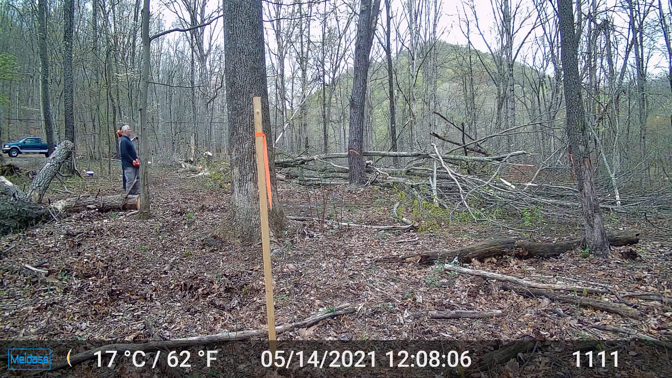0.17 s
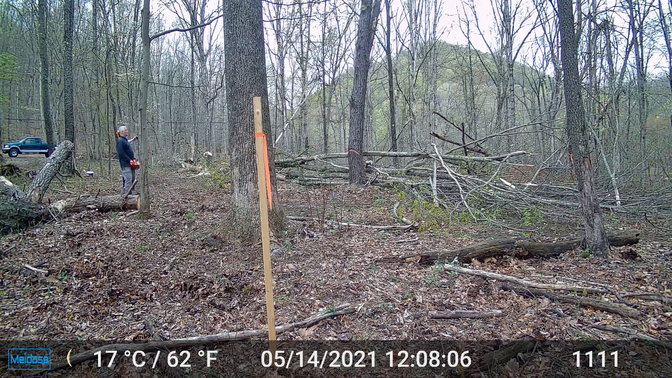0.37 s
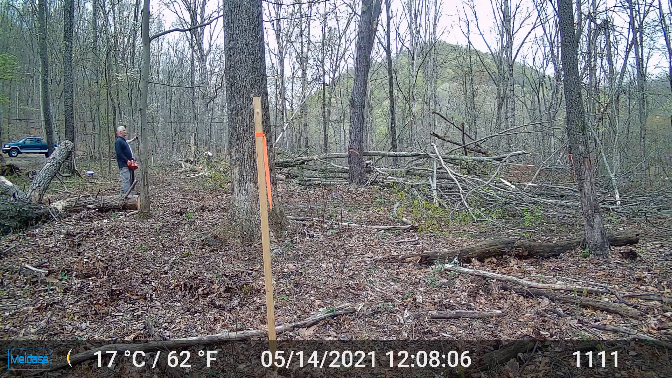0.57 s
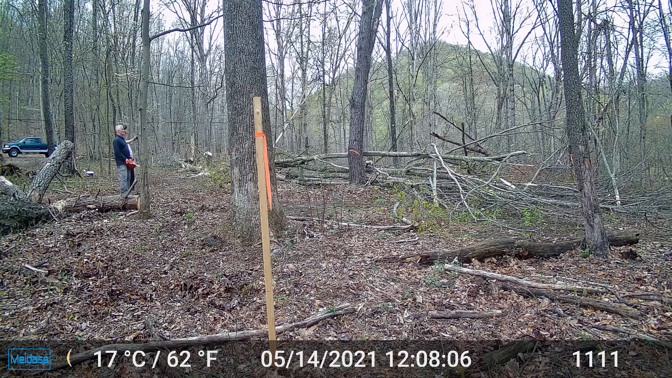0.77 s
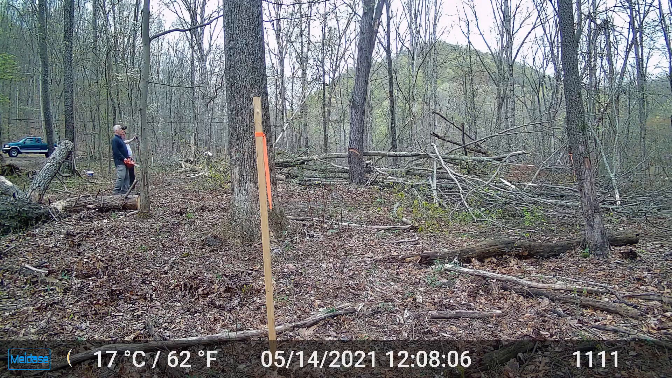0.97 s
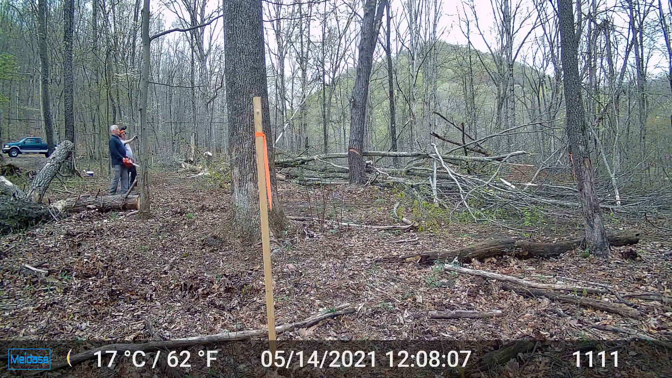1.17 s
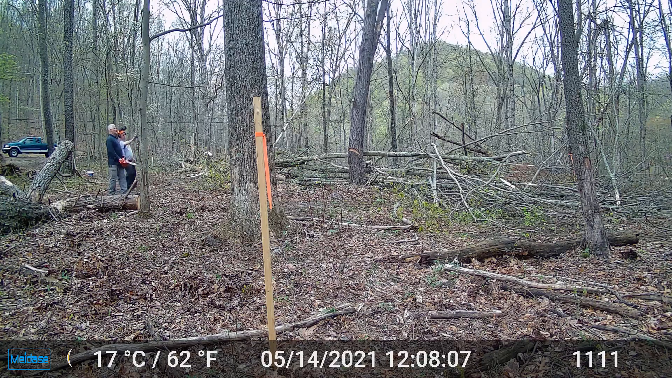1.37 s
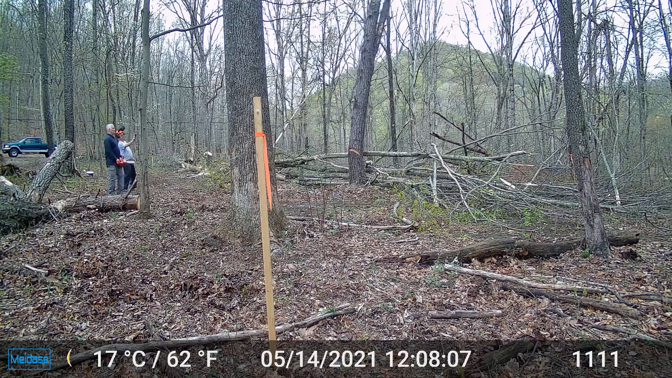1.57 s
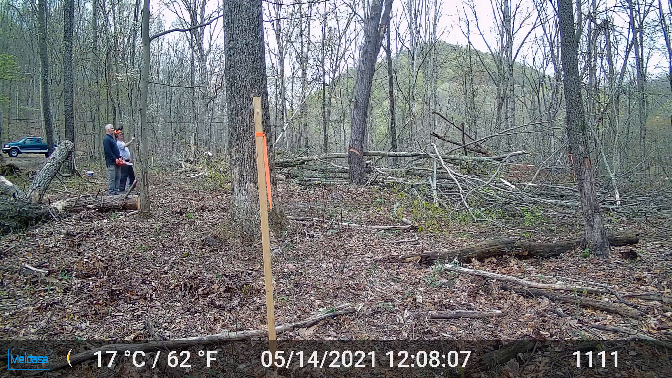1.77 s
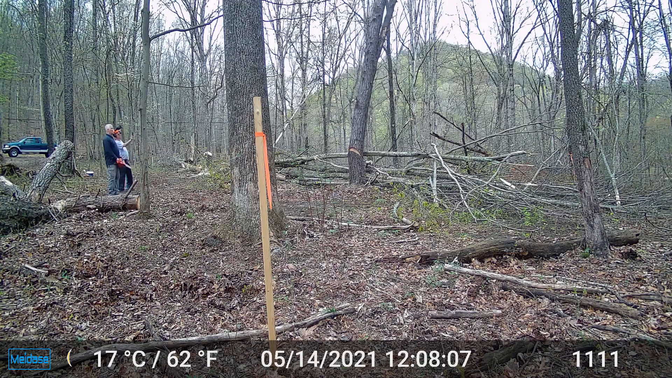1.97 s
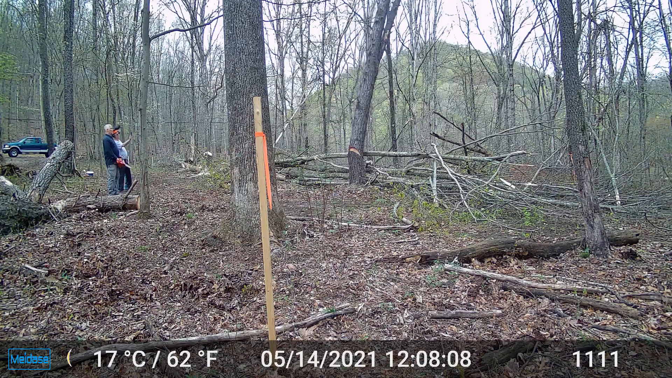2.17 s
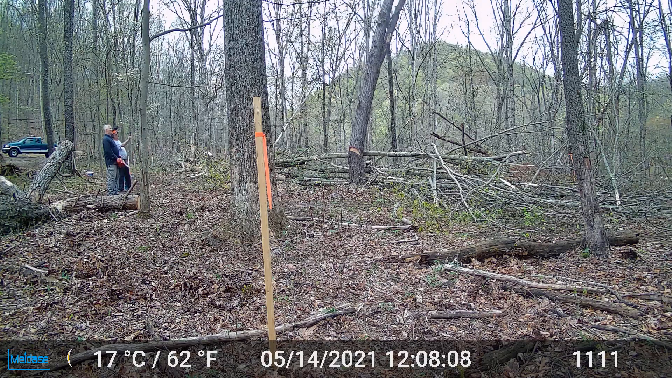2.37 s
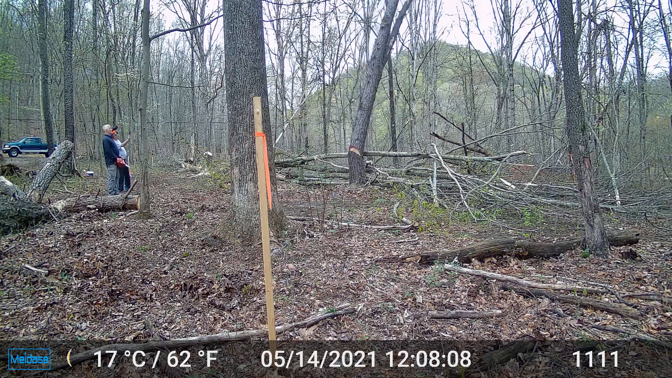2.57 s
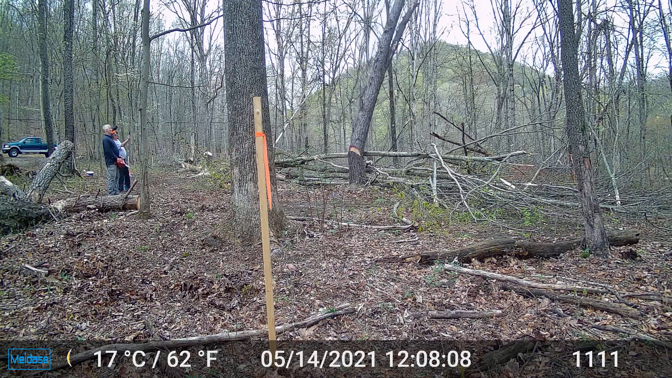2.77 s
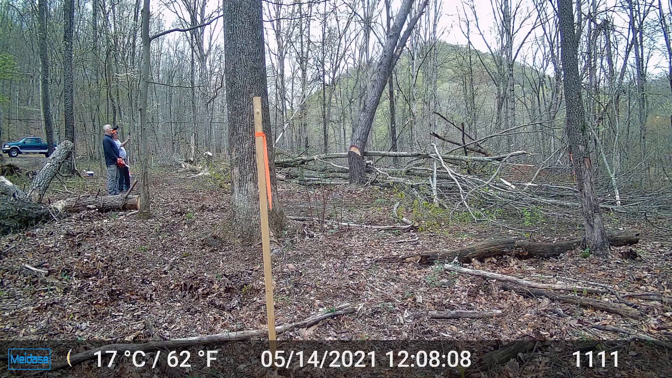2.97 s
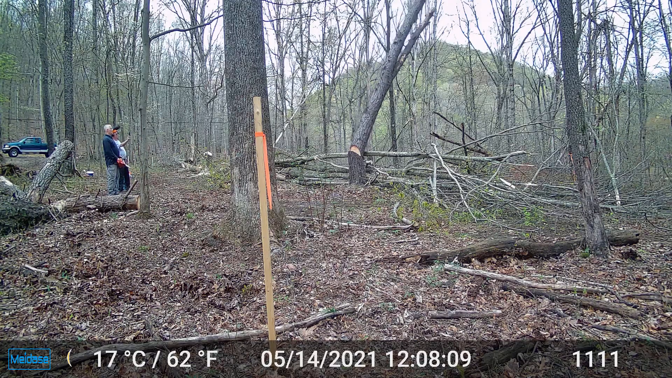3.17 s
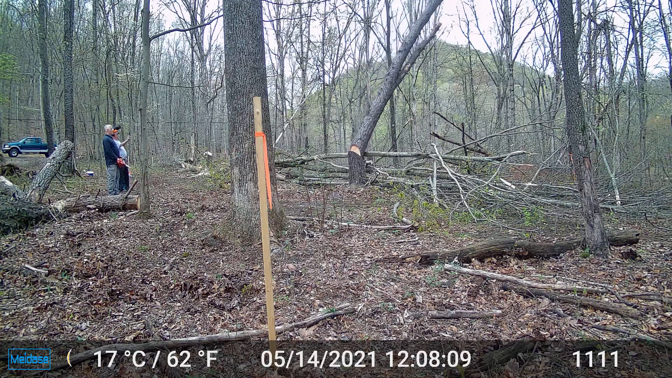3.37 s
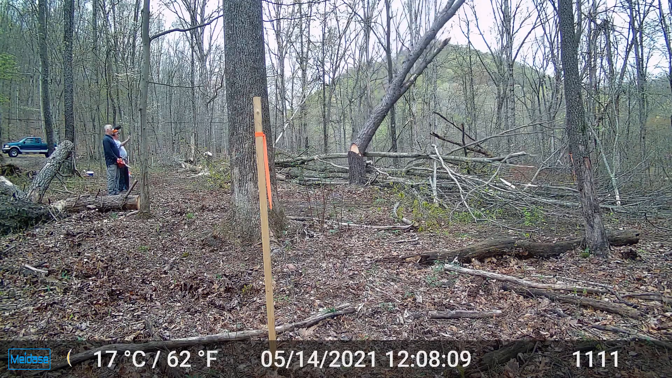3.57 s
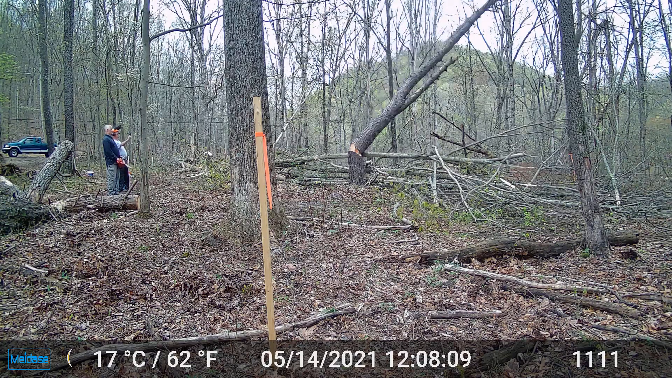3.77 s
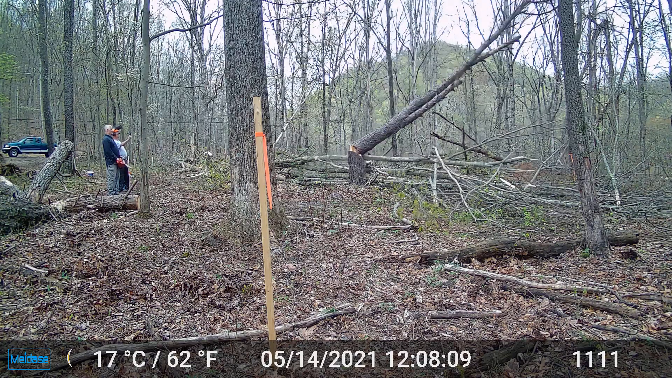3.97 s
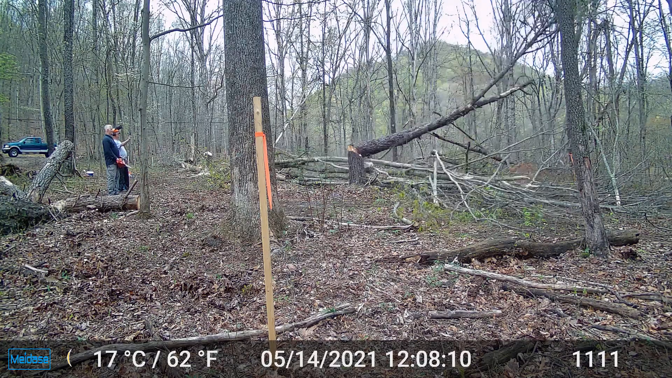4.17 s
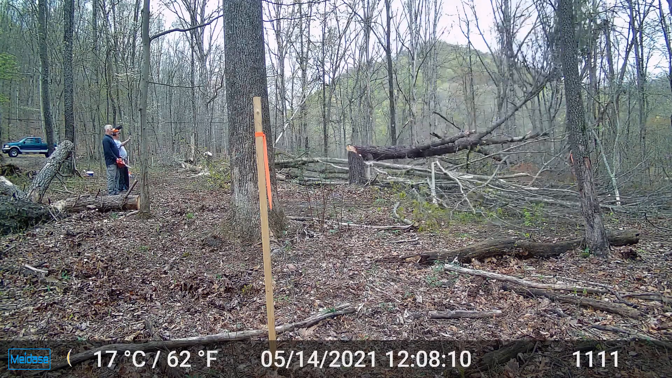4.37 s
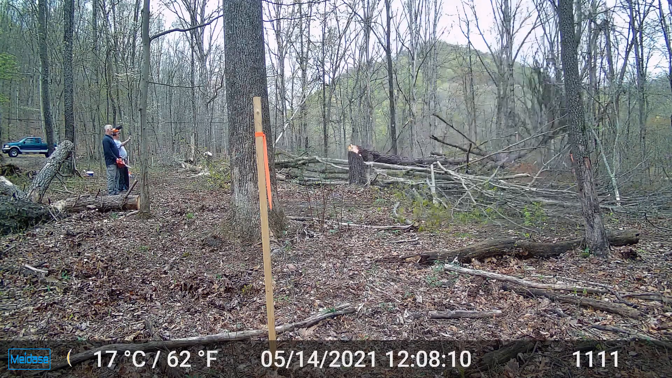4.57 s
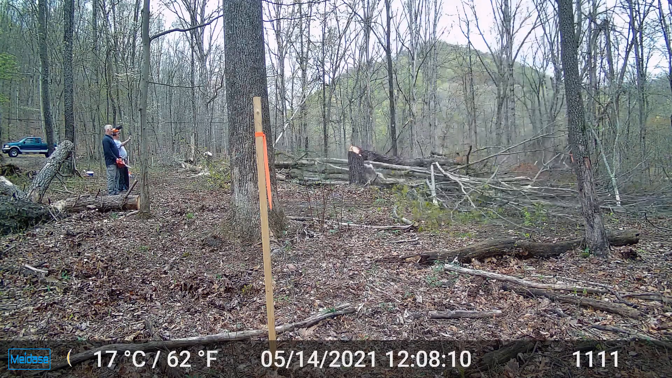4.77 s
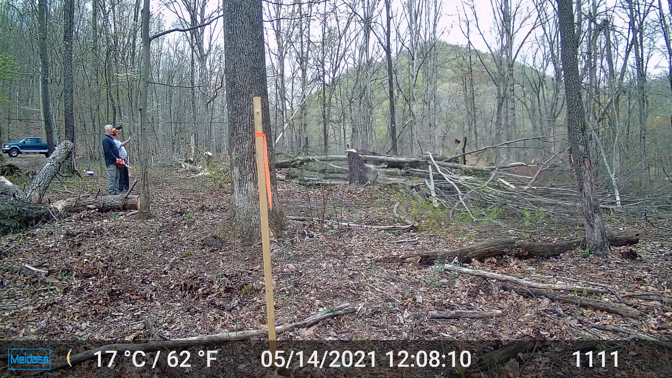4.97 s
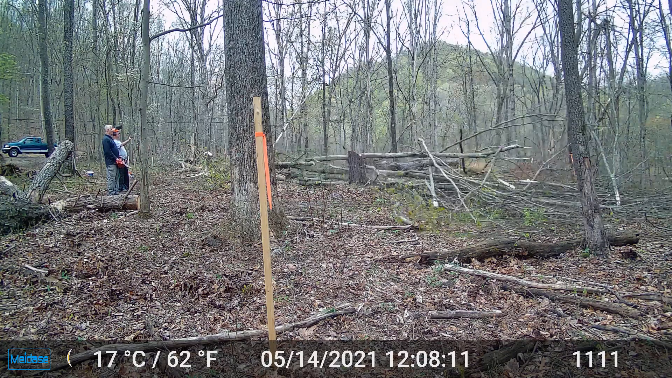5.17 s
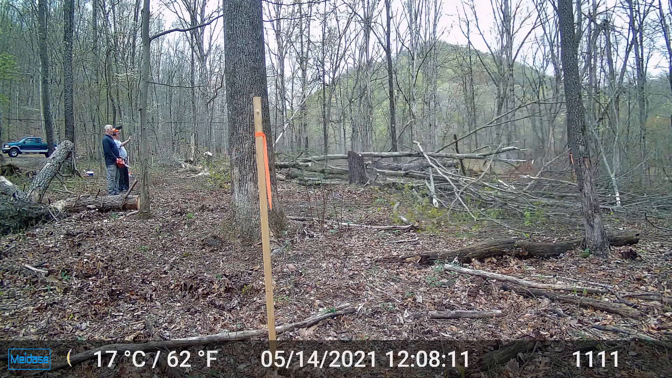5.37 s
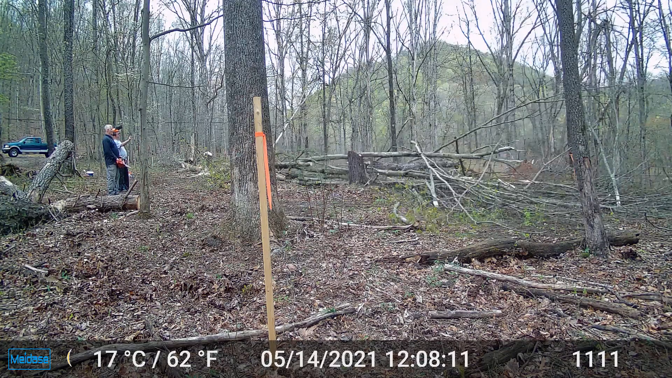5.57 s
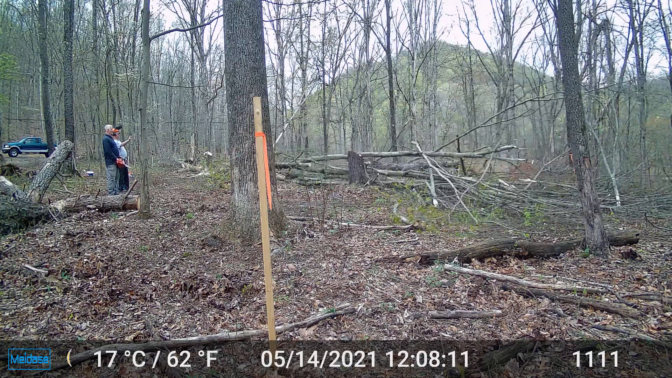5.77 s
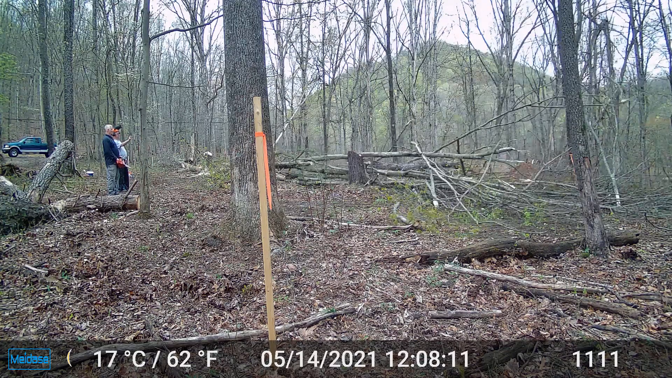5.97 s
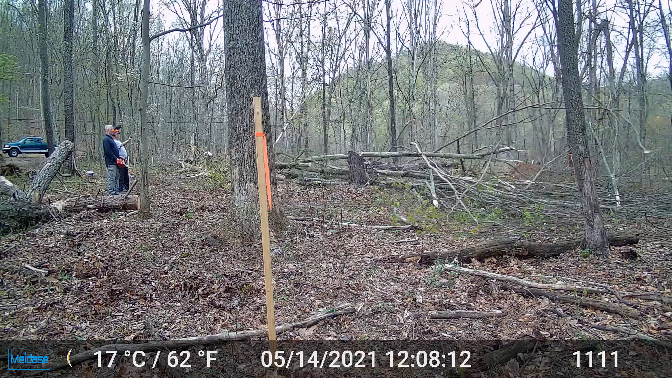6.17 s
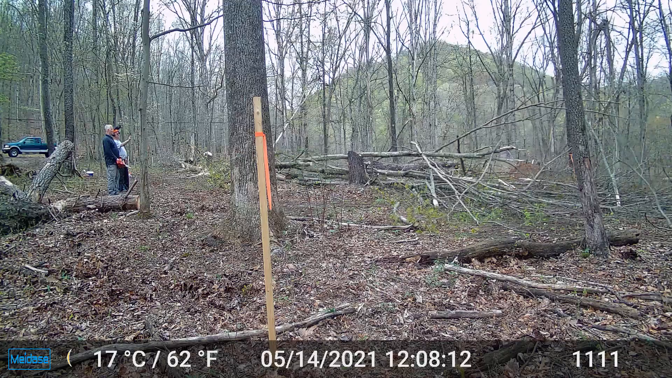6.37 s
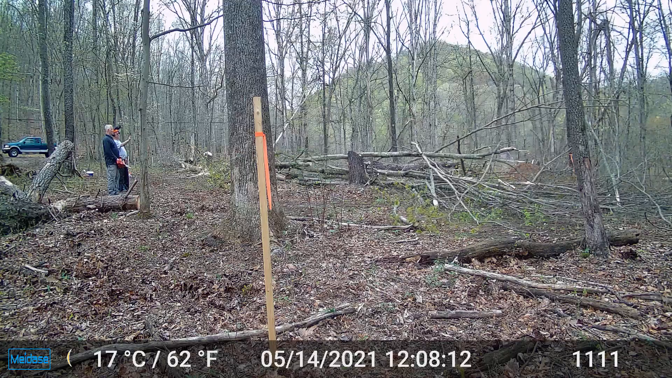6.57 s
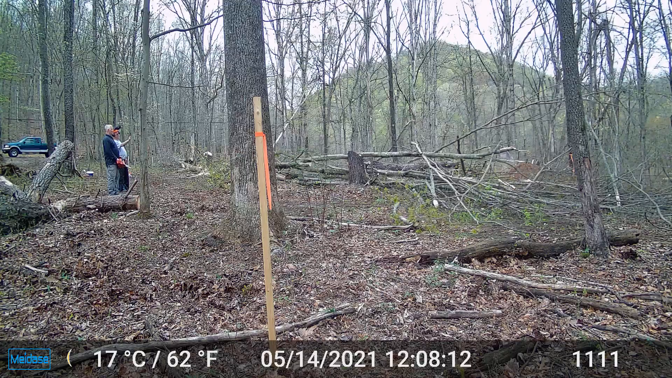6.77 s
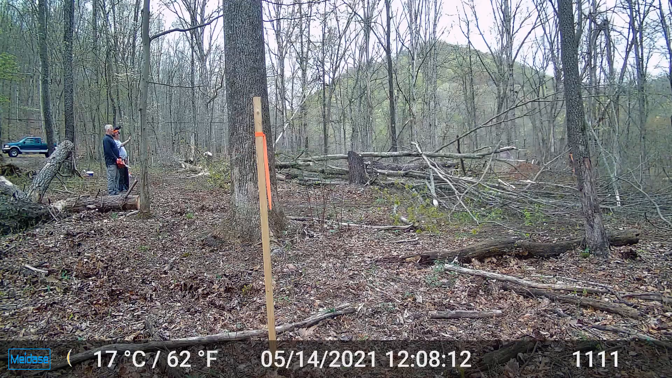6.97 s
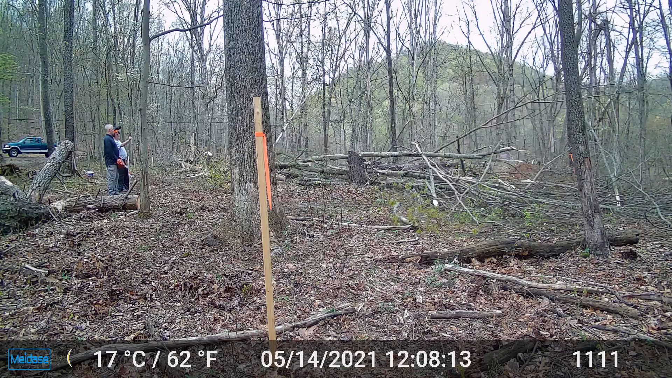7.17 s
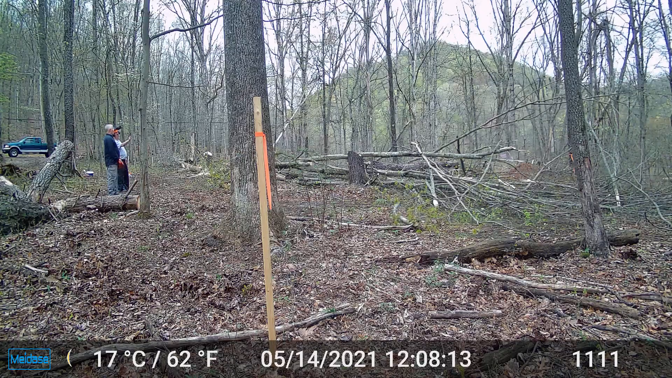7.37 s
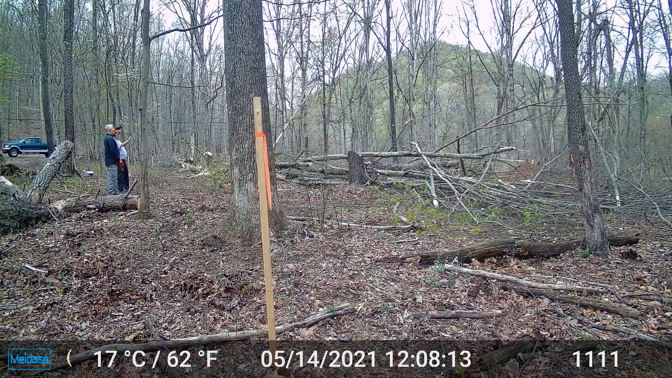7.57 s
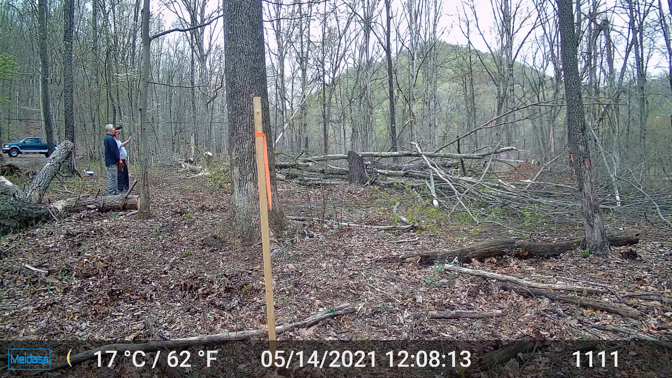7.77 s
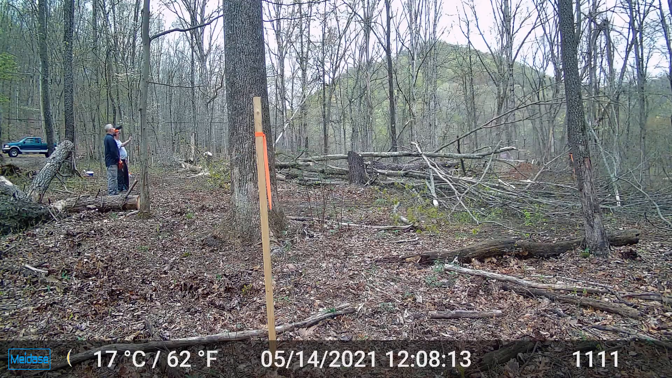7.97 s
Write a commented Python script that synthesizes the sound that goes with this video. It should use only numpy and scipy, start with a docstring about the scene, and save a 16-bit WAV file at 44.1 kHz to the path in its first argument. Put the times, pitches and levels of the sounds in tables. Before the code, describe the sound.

In still woods, a tree trunk starts to give way with a few sharp, ringing snaps that grow louder and closer together, each with a short forest echo. Branches break and leaves hiss as the crown sweeps down, then it crashes to the ground with deep thuds and a rumble. A few faint twigs snap as it settles. A small microphone overloads on the biggest cracks.

```python
"""In the woods, a felled tree goes over. The fibres of its hinge snap in a quickening run, each a
short ring of wood under ragged splintering, and the forest answers each one. The crown breaks
through branches, the trunk thuds down and bounces, then twigs and leaves settle in the still air.
A small trail camera hears it, and its microphone overloads on the big cracks."""
import sys
import numpy as np
from scipy import signal
from scipy.fft import rfft, irfft, next_fast_len
from scipy.io import wavfile
from scipy.ndimage import uniform_filter1d

SR = 44100
rng = np.random.default_rng(int(sys.argv[2]) if len(sys.argv) > 2 else 0)


def dump(signal):
    """Clip the signal to [-1, 1] and save it as 16-bit WAV at the path in sys.argv[1]."""
    limited = np.clip(np.atleast_2d(signal).T, -1, 1)
    pcm = np.round(limited * 32767).astype(np.int16)
    wavfile.write(sys.argv[1], SR, pcm)


N = 352932


def amp(db):
    return 10 ** (np.asarray(db) / 20)


def unit(x):
    return x / np.sqrt(np.mean(x ** 2) + 1e-20)


def fade(t, t60):
    return amp(-60 * t / t60)


def along(points, hz):
    """Read a curve of (Hz, value) points on a log frequency axis."""
    freqs, values = np.transpose(points)
    return np.interp(np.log(hz + 1), np.log(freqs + 1), values)


def filtered(x, response):
    """EQ x with a gain given as a function of frequency."""
    size = next_fast_len(len(x) + 4096)
    return irfft(rfft(x, size) * response(np.fft.rfftfreq(size, 1 / SR)), size)[:len(x)]


def low_pass(hz, edge_hz):
    """A steep, smooth roll-off."""
    return 1 / np.sqrt(1 + (hz / edge_hz) ** 56)


def coloured(x, spectrum):
    """x through an EQ curve, at rms 1."""
    return unit(filtered(x, lambda hz: amp(along(spectrum, hz))))


def noise(spectrum, size):
    return coloured(rng.standard_normal(size), spectrum)


def add(track, start, sound):
    """Mix a sound in at start seconds."""
    i = max(round(start * SR), 0)
    track[i:i + len(sound)] += sound[:max(len(track) - i, 0)]


def swell(start, end, db, rise_db_per_s, fall_db_per_s):
    """A gain that reaches db at start, holds until end and dies away."""
    t = np.arange(N) / SR
    return amp(db - rise_db_per_s * np.maximum(start - t, 0) - fall_db_per_s * np.maximum(t - end, 0))


def lumps(t, rate, depth_db):
    """A gain that jumps about at random, rate times a second."""
    knots = np.arange(0, t[-1], 1 / rate)
    jumps = np.clip(rng.standard_normal(len(knots)), -2, 2)
    return unit(amp(depth_db * np.interp(t, knots, jumps)))


def resonant(x, spacing_hz, depth_db):
    """Every piece of wood has its own uneven row of resonances."""
    grid = np.arange(0, SR / 2, spacing_hz)
    peaks_db = depth_db * np.clip(rng.standard_normal(len(grid)), -2, 2)
    return unit(filtered(x, lambda hz: amp(np.interp(hz, grid, peaks_db))))


def patchy(x, depth_db):
    """Different limbs sound from moment to moment: short patches in time and pitch."""
    bands = signal.stft(x, nperseg=512)[2]
    patches = uniform_filter1d(rng.standard_normal(bands.shape), size=3, axis=0)
    patches = uniform_filter1d(patches, size=4, axis=1)
    return unit(signal.istft(bands * amp(depth_db * unit(patches)), nperseg=512)[1][:N])


def crackle(spectrum, rate, spread_db, t60, rustle):
    """Tiny fractures of widely spread sizes over a share of even rustle, at rms 1."""
    sizes = (rng.random(N) < rate / SR) * amp(spread_db * np.minimum(rng.standard_normal(N), 2))
    tail = fade(np.arange(SR // 20) / SR, t60)
    power = np.abs(signal.fftconvolve(sizes ** 2, tail ** 2)[:N])
    envelope = np.sqrt(power / power.mean() + rustle)
    return coloured(envelope * rng.standard_normal(N), spectrum)


# The tone of the still woods. Each row: frequency in Hz, relative level in dB.
AIR_EQ = [(25,-6.5), (110,-2), (286,-12.5), (981,-15), (2500,-20), (6000,-22), (9000,-38.5)]


def still_air():
    """A faint, steady bed of air, weighted to the lows."""
    return amp(-54) * noise(AIR_EQ, N)


# The crown sweeps down, lands, sags onto its limbs, then stirs twice. Each row: start and end of the
# hold in seconds, branch level in dB, rise and fall in dB per second, leaves over branches in dB.
CROWN_MOVES = [(4.252, 4.603, -42, 21.5, 38, 10.5), (4.658, 4.987, -18, 170, 85, -4.5),
               (5.1, 5.307, -32.5, 148.5, 25, 0), (6.55, 6.647, -50.5, 8.5, 30, 5.5),
               (7.95, 8.0, -48.5, 132, 63, -5)]


def thrashing():
    """How hard the branches and the leaves are moving, as two gains."""
    gains = [swell(*shape) * amp([[0], [leaves_db]]) for *shape, leaves_db in CROWN_MOVES]
    return np.linalg.norm(gains, axis=0)


# The low end of shaken earth. Each row: frequency in Hz, relative level in dB.
EARTH_EQ = [(20, -29), (50, -5.5), (110, 3.5), (190, -2.5), (300, -11.5), (600, -20), (2000, -50)]


def earth_rumble():
    """The ground rumbles under the moving crown and shakes for as long as the tree is landing."""
    _, leaf_gain = thrashing()
    quake = swell(4.74, 5.04, db=-15, rise_db_per_s=135, fall_db_per_s=134)
    return (quake + amp(-8) * leaf_gain) * noise(EARTH_EQ, N)


# Butt, trunk and limbs meeting the ground.
# Each row: start in seconds, level in dB, settled pitch in Hz, time to fall 60 dB in seconds.
LANDINGS = [(3.268,-10.5,71,0.25), (3.614,-7,59.7,0.14), (4.738,-4.5,129.4,0.2), (4.745,-3.5,197.5,0.18),
            (4.785,-1,160,0.32), (4.886,-3,112.8,0.36), (4.945,-7,164.3,0.35), (5.013,0,111,0.12),
            (5.033,-2.5,58,0.12), (5.12,-0.5,76,0.063), (5.442,-15.5,196.4,0.06), (5.552,-11,64,0.073),
            (6.555,-23.5,58.6,0.3), (6.566,-17.5,145.5,0.068), (7.09,-16,244,0.045),
            (7.151,-23.5,131,0.083), (7.599,-31.5,87,0.13)]


def thuds():
    """Each landing is a low, quickly damped throb with a small drop in pitch."""
    out, t = np.zeros(N), np.arange(SR // 2) / SR
    for start, db, hz, t60 in LANDINGS:
        bend = 1 + 0.11 * np.exp(-t / 0.03)  # the contact is stiffest at first
        throb = np.sin(2 * np.pi * hz * np.cumsum(bend) / SR)
        attack = 1 - np.exp(-t / 0.0044)
        add(out, start, amp(db) * throb * attack * fade(t, t60))
    return out


# The crown's three textures: woody thrash, bright leaf hiss and full-bodied crush.
# Each row: frequency in Hz, relative level in dB.
BRANCH_EQ = [(60,-33.5), (250,-3.5), (700,-4.5), (1400,-0.5), (2200,-1), (3500,-12.5), (8000,-35)]
LEAF_EQ = [(500, -30.5), (1800, -15), (3000, -1.5), (5000, -3.5), (7200, -8.5), (9000, -11.5)]
CRUSH_EQ = [(60,-27.5), (250,-0.5), (700,-6), (1100,-2), (2100,0.5), (3500,-9), (7500,-25)]
# The mass of the crown hitting the ground. Each row: time of the peak in seconds, level in dB.
CROWN_HITS = [(4.857, 4.5), (4.99, -7)]


def crown():
    """Branches thrash, leaves hiss and the mass of the crown is crushed against the ground."""
    branch_gain, leaf_gain = thrashing()
    crush_gain = sum(swell(at, at, db, rise_db_per_s=213, fall_db_per_s=416) for at, db in CROWN_HITS)
    branches = patchy(crackle(BRANCH_EQ, rate=280, spread_db=6.5, t60=0.013, rustle=0.81), depth_db=1.5)
    leaves = patchy(crackle(LEAF_EQ, rate=280, spread_db=4, t60=0.0065, rustle=0.87), depth_db=2.5)
    crush = patchy(crackle(CRUSH_EQ, rate=690, spread_db=8, t60=0.01, rustle=1), depth_db=6)
    return branch_gain * branches + leaf_gain * leaves + crush_gain * crush


# The colour of the forest's echo. Each row: frequency in Hz, relative level in dB.
ECHO_EQ = [(40,-11.5), (130,-4.5), (300,-13), (560,-6.5), (850,-3), (1300,-0.5), (2200,-4), (3500,-6.5),
           (5000,-16), (8000,-22)]
# The length of its tail. Each row: frequency in Hz, time to fall 60 dB in seconds.
ECHO_DECAY = [(100,0.8), (500,1.08), (1100,0.84), (3000,0.6), (5000,0.58), (8000,.42)]


def forest_echo(t, splinter_db, near_db, near_t60, far_db, clump_db):
    """A break scatters quickly off near trunks, then leaves a long lumpy tail that loses its treble."""
    hz, lag, bands = signal.stft(noise(ECHO_EQ, len(t)), SR, nperseg=512)
    clumps = amp(clump_db * unit(uniform_filter1d(rng.standard_normal(bands.shape), size=4, axis=1)))
    treble_db = np.clip(5.4 * (splinter_db + 8.5), -9, 7)  # a dull break gives a dull echo
    shelf = amp(along([(3000, 0), (4300, treble_db)], hz))[:, None]
    decay = fade(lag, along(ECHO_DECAY, hz)[:, None])
    far = signal.istft(bands * clumps * shelf * decay, SR, nperseg=512)[1][:len(t)]
    near = noise(ECHO_EQ, len(t)) * lumps(t, rate=510, depth_db=5) * fade(t, near_t60)
    attack = 1 - np.exp(-t / 0.0046)
    return (amp(near_db) * near + amp(far_db) * far) * attack


# The bite of splintering wood. Each row: frequency in Hz, relative level in dB.
SPLINTER_EQ = [(100,-17.5), (600,-19), (1100,-7.5), (1700,2.5), (3200,2), (4500,-2.5), (7000,-8.5),
               (9000,-14)]


def fracture(t, hz, splinter_db, ring_t60, tear_t60, spacing_hz, depth_db):
    """One break: a sharp tick, then wood rings briefly on two close modes under ragged splintering."""
    ring = (np.sin(2 * np.pi * hz * t) + 0.5 * np.sin(2 * np.pi * 1.2 * hz * t)) * fade(t, ring_t60)
    splinters = resonant(noise(SPLINTER_EQ, len(t)), spacing_hz, depth_db)
    tear = splinters * lumps(t, rate=1100, depth_db=6) * fade(t, tear_t60)
    tick = 0.49 * splinters * fade(t, 0.0023)
    attack = 1 - np.exp(-t / 0.00047)
    return (ring + amp(splinter_db) * (tear + tick)) * attack


# Branches breaking.
# Each row: start in seconds, relative level in dB, ring pitch in Hz, splinter mix in dB.
BRANCH_BREAKS = [(4.029,-21.5,1604,-11), (4.092,-18.5,3360,-2), (4.170,-21.5,3390,-5),
                 (4.282,-11,2010,-1.5), (4.296,-12,1890,4.5), (4.304,-12,2140,-12), (4.315,-7.5,1600,2),
                 (4.346,-19,3440,5.5), (4.444,-14,1470,3.5), (4.457,-16.5,3380,-17), (4.479,-21,3730,8),
                 (4.584,-14.5,3130,-3.5), (4.670,-14.5,3750,6.5), (4.677,-7,1145,-16), (5.0879,-9,2420,-22),
                 (5.591,-27,3350,-2), (5.980,-33,1920,-20), (6.27,-29.5,2500,-15), (6.337,-31.5,1660,-22),
                 (6.481,-32,1930,-22), (6.836,-34.5,2710,-15), (7.093,-18,1250,-1), (7.148,-25.5,1373,-0.5),
                 (7.6,-36.5,2136,-16), (7.977,-33,5020,-10)]


def breaking_branches():
    """Branches break as the crown comes down, a few give way later; each sets side twigs chattering."""
    out, t = np.zeros(N), np.arange(SR // 2) / SR
    for start, db, hz, splinter_db in BRANCH_BREAKS:
        crack = amp(3.5) * fracture(t, hz, splinter_db, ring_t60=0.027, tear_t60=0.023,
                                    spacing_hz=172.6, depth_db=3.5)
        twigs = resonant(noise(SPLINTER_EQ, len(t)), spacing_hz=123.4, depth_db=5.5)
        chatter = amp(-12) * twigs * fade(t, 0.23)
        echo = forest_echo(t, splinter_db, near_db=-20, near_t60=0.099, far_db=-35, clump_db=11.5)
        add(out, start, amp(db) * (crack + chatter + echo))
    return out


def tearing_fibres():
    """Small fibres crackle in the hinge while the trunk leans, and all at once as it pulls free."""
    lean = swell(1.0, 3.55, db=-42, rise_db_per_s=23, fall_db_per_s=120.5)
    rip = swell(3.55, 3.61, db=-24, rise_db_per_s=55, fall_db_per_s=120.5)
    return (lean + rip) * crackle(SPLINTER_EQ, rate=190, spread_db=8, t60=0.018, rustle=0.01)


# The hollow body of the jolted trunk. Each row: frequency in Hz, relative level in dB.
TRUNK_EQ = [(25,-31.5), (60,2.5), (130,0.5), (280,-6.5), (490,0.5), (620,-14.5), (790,1), (1300,-33.5),
            (4000,-46.5)]


def trunk_knock(t, start):
    """A snap jolts the whole trunk; the knock deepens as the lean pulls harder on the ground."""
    low_cut_hz = np.interp(start, [1.2, 1.9], [115, 36])
    body = filtered(noise(TRUNK_EQ, len(t)), lambda hz: hz ** 2 / (hz ** 2 + low_cut_hz ** 2))
    attack = 1 - np.exp(-t / 0.00071)
    return body * attack * fade(t, 0.16)


# The lead layer: fibre bundles snapping in the hinge.
# Each row: start in seconds, relative level in dB, ring pitch in Hz, splinter mix in dB.
HINGE_SNAPS = [(0.3115,-18,1590,0.5), (0.3296,-23.5,3740,2.5), (0.38,-28.5,3650,-7.5),
               (0.587,-23.5,1400,-7.5), (0.609,-25.5,3210,1), (0.722,-14,1180,0), (0.7439,-5,3470,-3),
               (0.771,-4.5,1190,-4), (0.785,-2.5,1240,-8), (0.9413,-28,3620,-6), (1.1136,6.5,1164,-7),
               (1.172,-11.5,1630,-7.5), (1.2252,18,1153,-9), (1.4422,-20,1110,2), (1.5053,-14,1580,-7),
               (1.5629,-14.5,1690,4.5), (1.6032,-17,1980,1), (1.698,-2.5,1435,-7.5), (1.811,5,1592,-0.5),
               (1.888,-14,1240,-13.5), (1.9332,-12.5,1510,-7.5), (1.9538,-15.5,1650,-10.5),
               (2.0668,-7,1240,-18), (2.105,-11,1440,-17), (2.17,-22,4430,-6), (2.273,-21.5,4410,-7.5),
               (2.2958,5.5,1494,-4), (2.3919,2,1215,-8.5), (2.419,-11,2090,4.5), (2.439,-2.5,1550,-6.5),
               (2.5071,16,1512,-8.5), (2.599,13,1190,-18), (2.776,-4,2007,-6.5), (2.824,-3.5,1840,-4.5),
               (2.861,-14,2023,-2.5), (2.937,19,1190,-14.5), (3.081,12,1160,-8.5), (3.2083,8,1500,-2.5),
               (3.257,16,1303,-9), (3.346,5,2050,-6.5), (3.3869,11,1180,-7.5), (3.409,12,1180,-11.5),
               (3.4376,-10.5,3150,2.5), (3.4988,-10,1750,2), (3.5275,-1,1075,-3.5), (3.5527,7,1200,-7.5),
               (3.6046,14,1346,-8)]


def hinge():
    """Bundles snap one by one; thicker ones tear for longer, carry further and jolt the trunk harder."""
    out = np.zeros(N)
    t, echo_t = np.arange(SR // 5) / SR, np.arange(3 * SR // 4) / SR
    for start, db, hz, splinter_db in HINGE_SNAPS:
        thickness = 1 / (2 + np.exp(-(db + 0.5) / 5))
        knock = thickness * amp(-14.5) * trunk_knock(t, start)
        crack = amp(3) * fracture(t, hz, splinter_db, ring_t60=0.014, tear_t60=0.02 + 0.0051 * thickness,
                                  spacing_hz=190.7, depth_db=4)
        power = 1 + 1.6 * amp(splinter_db) ** 2  # ring and splintering both feed the echo
        send = amp(-1.53 + 0.22 * db) * np.sqrt(power)
        echo = forest_echo(echo_t, splinter_db, near_db=-20.5, near_t60=0.097, far_db=-34.5, clump_db=5.5)
        add(out, start, amp(db) * (crack + knock))
        add(out, start, amp(db) * send * echo)
    return out


def scene():
    """The breaking hinge, the falling crown and the landing, in mono over the still air of the woods."""
    wood = hinge() + tearing_fibres() + breaking_branches()
    return (wood + crown() + thuds() + earth_rumble() + still_air())[None]


def record(dry):
    """The camera's narrow-band microphone feeds an input stage that flattens the biggest peaks."""
    mic_hz, top_hz, ceiling, hardness = 7900, 16200, 0.72, 14
    heard = filtered(dry[0], lambda hz: low_pass(hz, mic_hz))
    overloaded = heard / (1 + np.abs(heard / ceiling) ** hardness) ** (1 / hardness)
    # A shelf that tames the overload's fizz. Each row: frequency in Hz, gain in dB.
    shelf = [(7800, -1), (9000, -13), (16000, -12)]
    return filtered(overloaded, lambda hz: amp(along(shelf, hz)) * low_pass(hz, top_hz) ** 3)[None]


dry = scene()
out = record(dry)
dump(out)
```